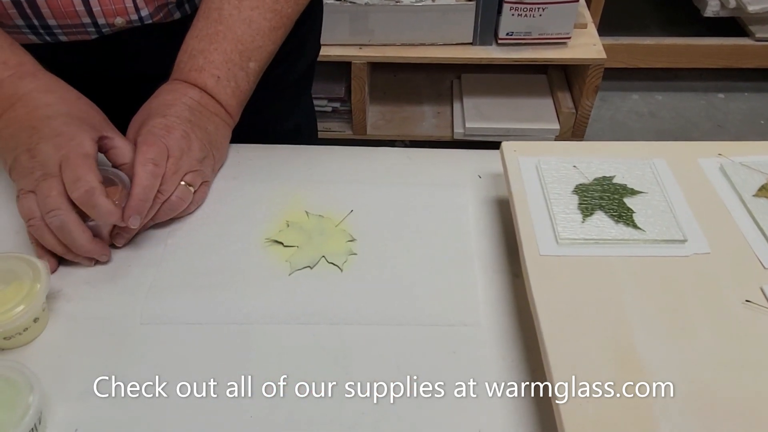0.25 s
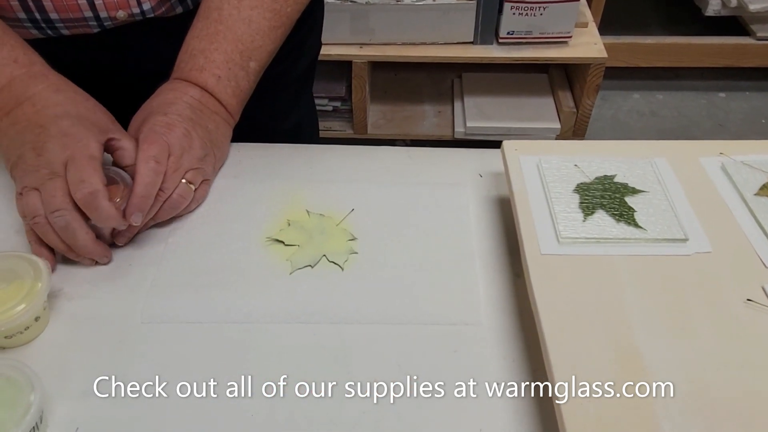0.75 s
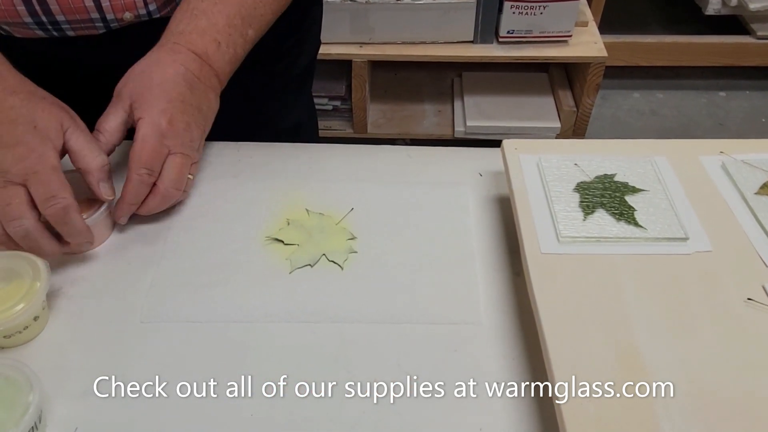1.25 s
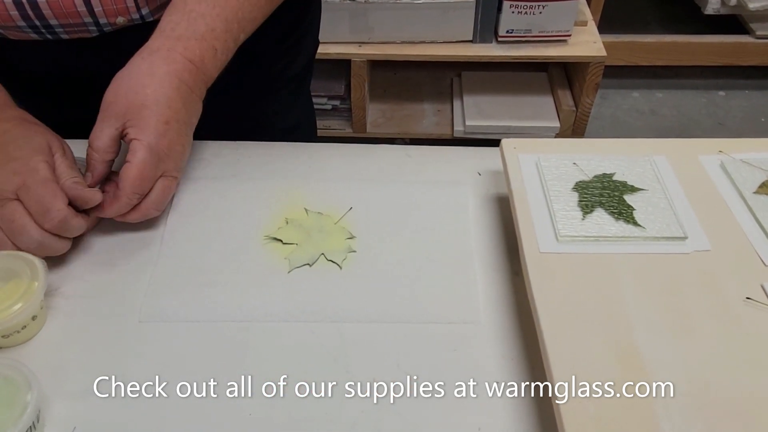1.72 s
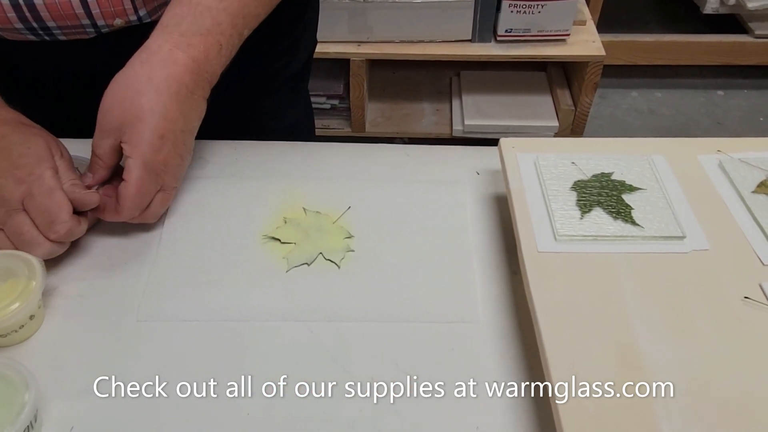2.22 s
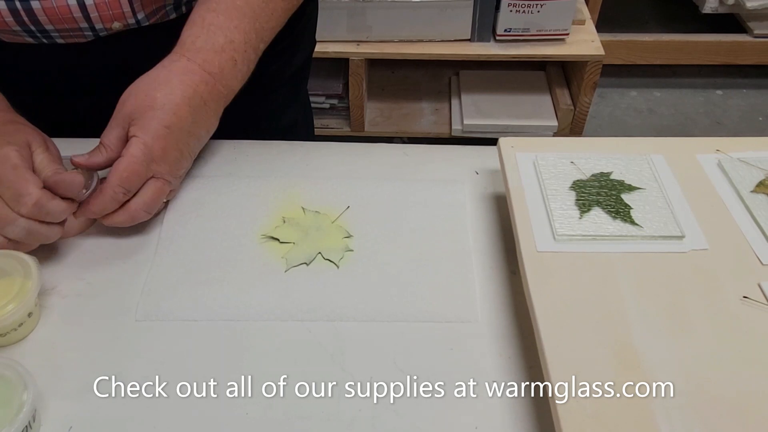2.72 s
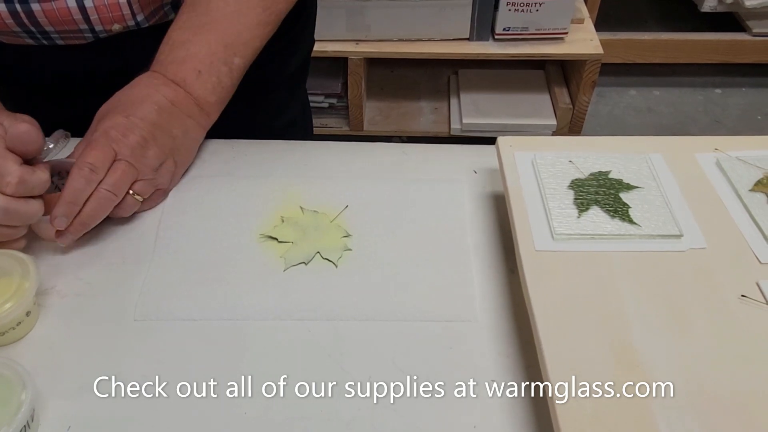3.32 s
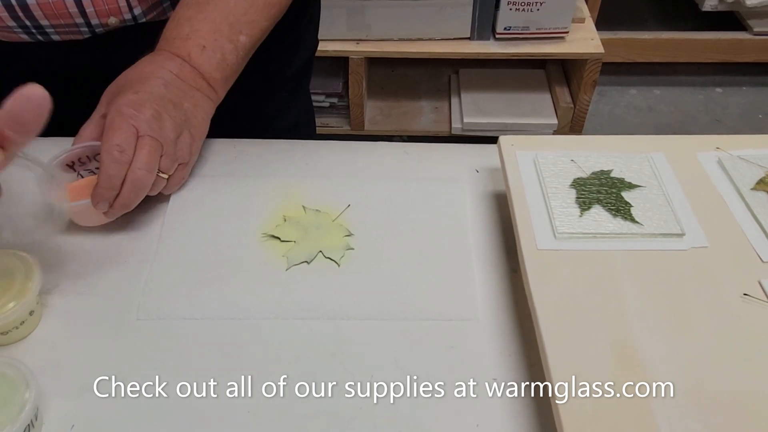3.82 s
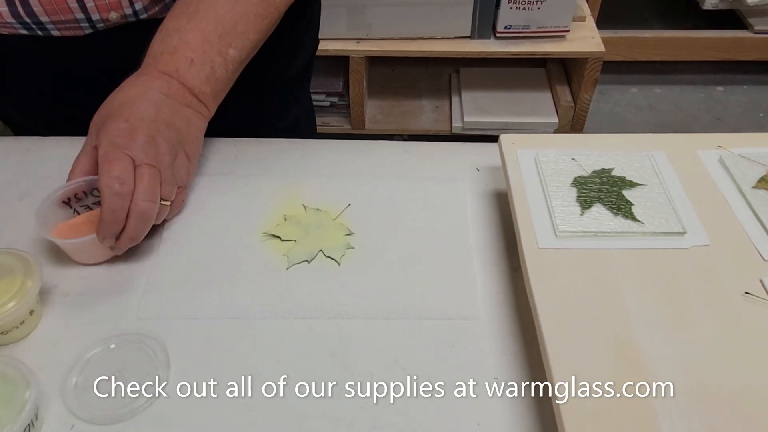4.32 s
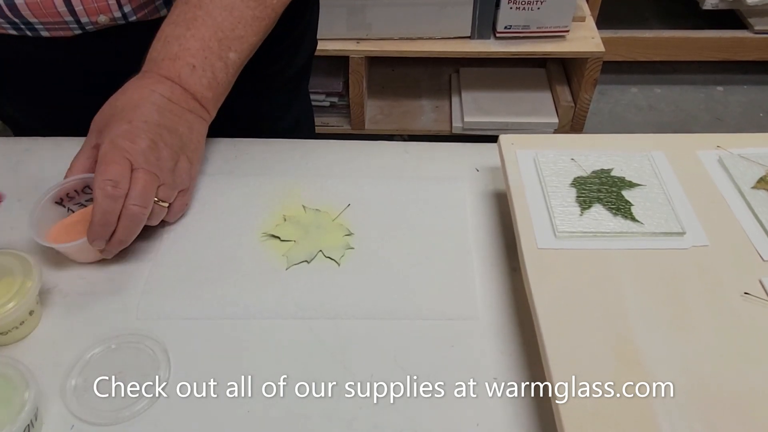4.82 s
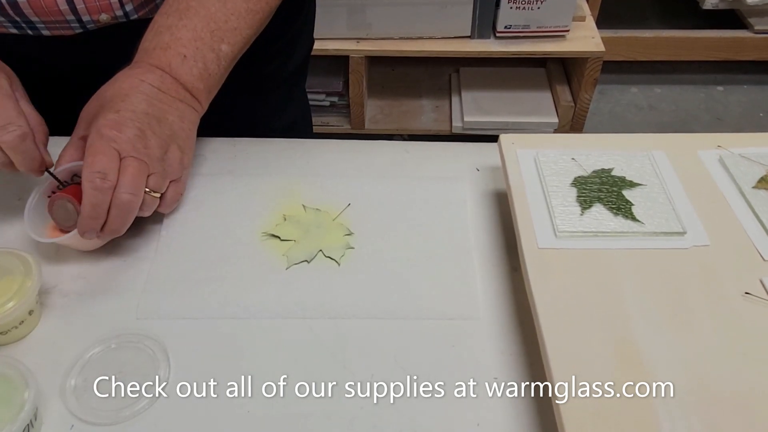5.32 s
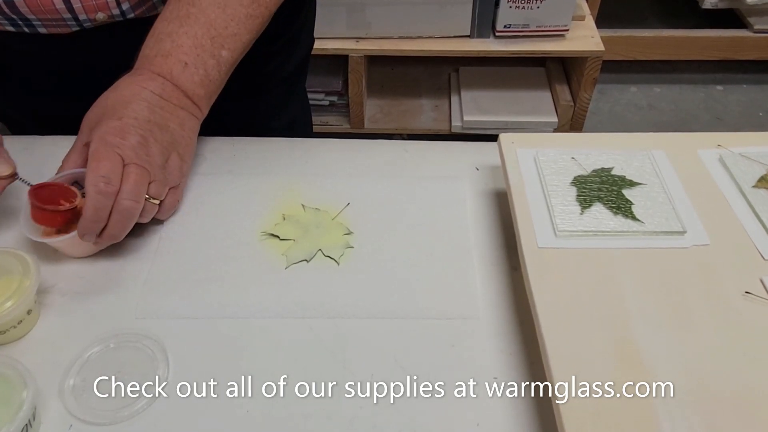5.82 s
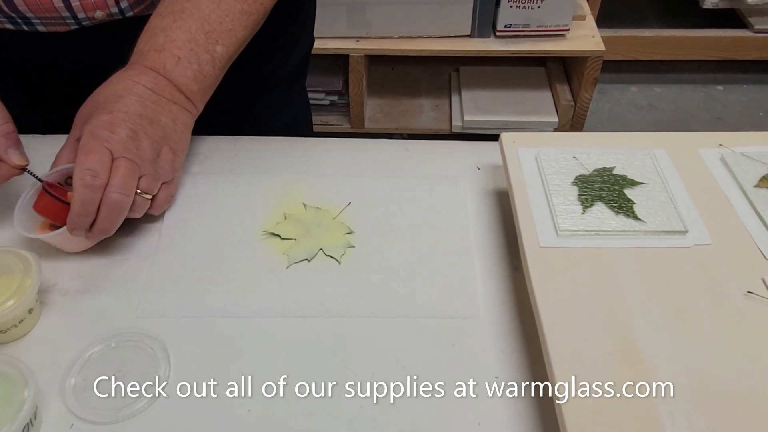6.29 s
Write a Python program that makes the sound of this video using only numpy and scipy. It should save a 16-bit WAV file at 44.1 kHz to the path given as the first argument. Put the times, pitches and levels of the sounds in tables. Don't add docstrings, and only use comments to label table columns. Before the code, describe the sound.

Thin plastic cup lid is pried loose with sharp snaps and faint finger rubbing, then drops and rattles on a bench over low hum.

```python
import sys
import numpy as np
from scipy import signal
from scipy.fft import rfft, irfft, next_fast_len
from scipy.io import wavfile
from scipy.ndimage import uniform_filter1d

SR = 44100
rng = np.random.default_rng(int(sys.argv[2]) if len(sys.argv) > 2 else 0)


def put_to_file(sound):
    columns = np.atleast_2d(sound).T
    safe = np.clip(columns, -1, 1)
    whole_steps = np.round(safe * 32767)
    wavfile.write(sys.argv[1], SR, whole_steps.astype(np.int16))


def nominal_scale(level):
    x = np.asarray(level, float) / 20
    return 10 ** x


N = 288855

# centre in Hz, width in Hz, level in dB.
RIM_MODES = [(1770, 190, -24), (2220, 500, -20.5), (2900, 1400, -5), (3960, 250, -13.5), (4480, 147, -10.5),
             (5260, 400, -8.5), (5760, 300, -7.5), (7035, 320, -3), (8540, 110, -12.5)]
# centre in Hz, width in Hz, level in dB.
WALL_MODES = [(760, 120, 10), (1100, 260, -0.5), (1330, 170, 0.5), (2090, 200, 0)]
# centre in Hz, width in Hz, level in dB.
BENCH_MODES = [(330, 290, -2), (560, 140, -7.5)]


def rim_snaps():
    # time in seconds, peak in dB, own ring in Hz, cup wall and treble in dB against the peak. Mostly
    # rim snaps; 0.887 and 2.5145 s are sharp starts of slides, 2.131 s echoes the snap before it, and at 4.0333
    # and 4.036 s the lid first strikes the bench.
    snaps = [(0.0105, -39, 3600, -20, -30), (0.0186, -8, 4040, -24, -6.5), (0.0273, -16, 2030, -27, -15),
             (0.046, -26, 2800, -16, -22), (0.880, -38, 4430, -24, -19), (0.887, -44, 7000, -24, -12),
             (0.9035, -26, 3690, -10, -11), (1.5349, -31.5, 7960, -40, -23),
             (1.5643, -29.5, 5400, -14.5, -25), (1.9864, -49.5, 1820, 10.5, -23),
             (2.0084, -43.5, 3560, 3.5, -20.5), (2.0159, -13.5, 3360, -49, -11.5),
             (2.1155, -6.5, 4680, -56, -24), (2.131, -28.5, 4636, -28, -25.5),
             (2.2216, -10.5, 3500, -23, -14), (2.3798, 1.5, 5000, -27, -32), (2.395, -26.5, 4700, -28, -30),
             (2.409, -26, 5000, -24, -28.5), (2.5145, -35, 5200, -22, -10), (2.5607, -21.5, 2230, -11, -24),
             (2.6866, -26.5, 4930, -25, -3.5), (3.4267, -20.5, 3060, -25, -11.5),
             (3.4285, -26, 4900, -30, -30), (3.486, -27, 2700, -24, -29), (3.5732, -34, 4870, -23, -26),
             (4.0333, -21.5, 3620, -29, -6.5), (4.036, -12.5, 4150, -38, -43)]
    return knocks(snaps, RIM_MODES, WALL_MODES, own_width=850, own_db=0.67, tick_hz=8500,
                  rattle=0.031, ms=1, soft_hz=8600)


def lid_bounces():
    # time in seconds, peak in dB, own ring in Hz, treble in dB against the peak.
    bounces = [(4.0888, -13, 4460, -17), (4.093, -11.5, 2620, -40), (4.1193, -10.5, 3650, -37),
               (4.126, -13, 2580, -40), (4.172, -24, 3480, -20), (4.199, -20, 4430, -31),
               (4.219, -15.5, 3870, -47), (4.2371, -25.5, 4470, -32), (4.2432, -18.5, 4460, -41),
               (4.2539, -22, 4480, -39), (4.2613, -31, 4000, -30), (4.279, -24, 3330, -33),
               (4.3004, -40, 4600, -25), (4.312, -39, 4560, -27), (4.331, -29, 4500, -31),
               (4.3473, -24, 4580, -49), (4.361, -39, 2560, -40), (4.384, -38, 2600, -36)]
    # centre in Hz, width in Hz, level in dB.
    lid_modes = [(1220, 210, -9), (2166, 34, 2.5), (3050, 190, 2), (3690, 71, -6), (3930, 160, -5),
                 (4190, 54, -8), (4480, 62, -16), (4680, 37, -25), (5060, 81, -13),
                 (2518, 22, 10), (2548, 16, 17), (2630, 24, 10), (2690, 30, 3), (2815, 36, 5)]
    bench_db = -24.5
    rows = [(s, db, hz, bench_db, treble_db) for s, db, hz, treble_db in bounces]
    return knocks(rows, lid_modes, BENCH_MODES, own_width=270, own_db=1.8, tick_hz=9000,
                  rattle=0.062, ms=3.07, soft_hz=9000)


def cup_thuds():
    # time in seconds, peak in dB, own ring in Hz, bench in dB against the peak. The rows at 0.604 and
    # 3.436 s are echoes of the thuds just before them.
    thuds = [(0.0185, -11.5, 840, -48), (0.0203, -12, 1114, -26), (0.028, -13.5, 1050, -50),
             (0.05, -37, 1050, -25), (0.062, -32, 830, -28), (0.595, -28.5, 760, -12),
             (0.604, -34.5, 1100, -29), (0.634, -51, 740, -18), (2.019, -21.5, 1810, -27),
             (2.221, -25.5, 1480, -46.5), (2.332, -36, 1248, -14), (2.379, -26, 1650, -41.5),
             (2.565, -34, 680, 3.5), (2.689, -34.5, 1190, -29), (3.426, -17.5, 1370, -40),
             (3.436, -28, 1660, -25), (3.487, -36, 660, -20), (4.035, -24, 1170, -7), (5.543, -47, 1300, 8)]
    # centre in Hz, width in Hz, level in dB.
    cup_modes = [(771, 60, 10.5), (843, 95, -5), (1085, 90, 4), (1380, 260, 8), (2040, 220, 2)]
    treble_db = -34.5
    rows = [(*row, treble_db) for row in thuds]
    return knocks(rows, cup_modes, BENCH_MODES, own_width=130, own_db=11.0, tick_hz=2500,
                  rattle=0.031, ms=1.76, soft_hz=2280)


def nail_and_sieve_ticks():
    # time in seconds, peak in dB, own ring in Hz. The row at 1.1463 s is the sharp start of a slide.
    ticks = [(0.4874, -56, 5420), (1.1463, -51, 6590), (1.1767, -33.5, 7600), (1.1947, -32, 6900),
             (1.3598, -44, 7700), (1.617, -36.5, 9150), (1.6244, -37, 8860), (3.1356, -30.5, 7600),
             (3.1484, -38, 7030), (3.99, -59, 8100), (5.1454, -54, 5260), (5.7414, -50, 8600),
             (6.352, -51.5, 9000), (6.3679, -46, 7680), (6.4126, -47, 5410), (6.4264, -51, 8100)]
    wall_db, treble_db = -49, -5.5
    rows = [(*row, wall_db, treble_db) for row in ticks]
    return knocks(rows, RIM_MODES[-2:], WALL_MODES, own_width=4300, own_db=3.0, tick_hz=16000,
                  rattle=0.11, ms=0.32)


def knocks(rows, modes, low_modes, own_width, own_db, tick_hz, rattle, ms, soft_hz=16000):
    size, lead = 8192, 256
    out = np.zeros(N + size)
    t = (np.arange(size) - lead) / SR
    creak = 0.15 * np.exp(np.minimum(t, 0) / 0.002)
    decay = np.exp(-np.maximum(t, 0) * 1000 / max(ms, 0.05))
    swell = np.where(t < 0, creak, decay)
    bursts = rng.standard_normal((len(rows), 1024))
    for (s, db, hz, low_db, treble_db), noise in zip(rows, bursts):
        burst = rattle * np.pad(noise ** 3, (0, size - 1024)) * swell
        burst[lead + 24] = 1
        push = below(burst, soft_hz)
        ring = body(push, modes) + nominal_scale(own_db) * resonate(push, hz, own_width)
        low = body(push, low_modes)
        cracks = 0.3 * np.pad(noise, (0, size - 1024)) * swell
        tick = below(below(above(burst + cracks, tick_hz), 15000), 15000)
        parts = (db, ring), (db + low_db, low), (db + treble_db, tick)
        sound = sum(nominal_scale(peak_db) * part / abs(part).max() for peak_db, part in parts)
        start = round(s * SR) - lead
        out[start:start + size] += sound
    return out[:N]


def rubbing():
    # start in seconds, hold in seconds, rub in dB,
    # cup wall and whistle in dB against the rub.
    slides = [(0.21, 0.0045, -70.5, 8.5, -21), (0.37, 0.025, -62.5, 0, -8), (0.64, 0.028, -63.5, -1.5, -4),
              (0.78, 0.079, -63, 1, -5.5), (0.895, 0.0035, -49, -5, -5), (0.94, 0.091, -64, 0, -5.5),
              (1.15, 0.043, -59, 3.5, -3.5), (1.28, 0.023, -59, 2, -3), (1.365, 0.032, -54.5, -8, 2.5),
              (1.415, 0.023, -46, -7, -3.5), (1.535, 0.033, -54.5, -6, 3), (1.61, 0.039, -67.5, -2, -6),
              (1.7, 0.016, -47, -11.5, -5.5), (2.51, 0.056, -51.5, -0.5, -8), (2.62, 0.05, -54, -3.5, -5.5),
              (2.715, 0.023, -49.5, 3, -2.5), (6.485, 0.02, -60, -3, -2.5)]
    # start in seconds, hold in seconds,
    # rub in dB, cup wall and whistle in dB against the rub.
    twists = [(2.83, 0.061, -63.5, -1, -1.5), (2.9, 0.019, -63, 4, 1.5), (2.95, 0.0089, -46.5, -3, -4),
              (3.035, 0.023, -53.5, -3, -6), (3.072, 0.035, -47.5, -5.5, -15),
              (3.16, 0.062, -50, -4.5, -11), (3.35, 0.027, -60.5, -8, -7), (3.405, 0.018, -54.5, -4, -8),
              (3.44, 0.093, -59, -7, -15), (3.568, 0.0042, -53.5, -9, -1), (3.6, 0.17, -72, -3, -10),
              (3.8, 0.18, -68, -37, -8), (4.46, 0.041, -70, -8, -8.5), (4.93, 0.031, -70.5, -15, -7.5)]
    # start in seconds, hold in seconds, rub in dB,
    # cup wall and whistle in dB against the rub.
    skids = [(0.012, 0.014, -44, 10, -24.5), (0.022, 0.0053, -35.5, -13, -21),
             (2.33, 0.029, -37.5, -28, -36.5), (2.514, 0.014, -60.5, -13, 7.5), (4.2, 0.13, -52, -9, -24)]
    # centre in Hz, width in Hz, level in dB.
    rub_modes = [(2330, 1700, 2), (3500, 730, 1.5), (4600, 1070, 8), (6026, 1100, 1.5), (6700, 1400, 5.5)]
    # centre in Hz, width in Hz, level in dB.
    skid_modes = [(1300, 350, 4.5), (2310, 1400, 14.5), (4230, 6000, -4.5)]
    # centre in Hz, width in Hz, level in dB.
    whistle_modes = [(7160, 3000, 0.1)]
    # centre in Hz, width in Hz, level in dB.
    lip_modes = [(7550, 950, 0.1)]
    # frequency in Hz, level in dB per Hz.
    fizz_colour = [(5180, -15), (6500, -15), (9500, 2), (13600, -5.5), (15000, -14.5), (16000, -30),
                   (16500, -43)]

    grip = nominal_scale(2.2 * evened(uniform_filter1d(rng.standard_normal(N), 130)))
    slip_size = nominal_scale(3.1 * np.minimum(rng.exponential(1, (3, N)), 5))
    both, left, right = grip * rng.standard_normal((3, N)) * slip_size
    slips = both + 3.3 * np.array([left, right])
    rim = above(body(slips, rub_modes), 1200)
    rim = below(rim, 6880)
    skidding = body(slips, skid_modes)
    wall = body(slips, WALL_MODES)
    whistle = body(body(slips, whistle_modes), whistle_modes)
    fizz = shaped(slips, lambda hz: nominal_scale(read(fizz_colour, hz)))
    lip = body(body(slips, lip_modes), lip_modes)

    slide = stroke_gains(slides, rise_db_per_s=749)
    twist = stroke_gains(twists, rise_db_per_s=749)
    skid = stroke_gains(skids, rise_db_per_s=4007)
    fizz_gain = nominal_scale(0.5) * (slide + skid)[2] + nominal_scale(-8.5) * twist[0]
    layers = [(rim, (slide + twist)[0]), (skidding, skid[0]), (wall, (slide + twist + skid)[1]),
              (whistle, (slide + skid)[2]), (fizz, fizz_gain), (lip, twist[2])]
    span = round(0.02 * SR)
    wander = rng.standard_normal((len(layers), N))
    wander = uniform_filter1d(uniform_filter1d(wander, span), span)
    return sum(evened(layer) * gain * nominal_scale(2.5 * evened(w)) for (layer, gain), w in zip(layers, wander))


def stroke_gains(rows, rise_db_per_s):
    fall_db_per_s = 522.5
    t, gain = np.arange(N) / SR, np.zeros((3, N))
    for s, hold, db, wall_db, whistle_db in rows:
        span = slice(round(max(s - 0.1, 0) * SR), round((s + hold + 0.15) * SR))
        rise_db = rise_db_per_s * np.maximum(s - t[span], 0)
        fall_db = fall_db_per_s * np.maximum(t[span] - s - hold, 0)
        gain[:, span] += nominal_scale(db - rise_db - fall_db) * nominal_scale(np.array([[0], [wall_db], [whistle_db]]))
    return gain


def shop(x):
    # frequency in Hz, time to fall by 60 dB in seconds.
    decay_times = [(300, 0.46), (1000, 0.16), (3000, 0.2), (6000, 0.23), (12000, 0.36)]
    # delay in milliseconds, level in dB.
    early = [(1.6, -11.5), (2.5, -28), (8.5, -19.5), (11, -29), (14.5, -38.5), (28, -33.5)]
    # frequency in Hz, level in dB.
    absorption = [(300, -7.5), (600, -7), (900, 0), (2000, -4.5), (3500, -4.5), (5500, -6.5), (8000, -13),
                  (12000, -18.5)]

    taps = np.zeros((3, 2, SR // 2))
    jitter = rng.integers(0, 20, (3, 2, (SR // 2 - 121) // 20))
    at = np.arange(120, SR // 2 - 20, 20) + jitter
    np.put_along_axis(taps, at, rng.choice([-1., 1.], at.shape), 2)
    hz, t, z = signal.stft(taps, SR, nperseg=128)
    t60 = np.maximum(read(decay_times, hz), 0.03)[:, None]
    tail = signal.istft(z * nominal_scale(-60 * t / t60), SR, nperseg=128)[1]
    build_s = 0.0022
    tail *= 1 - np.exp(-(np.arange(tail.shape[-1]) / (build_s * SR)) ** 2)
    tail /= np.linalg.norm(tail[0, 0])
    echoes = np.zeros((2, 2048))
    for ms, db in early:
        echoes[:, round(ms * SR / 1000)] += nominal_scale(db) * np.array([0.8, 1.1])
    phase = np.arange(3)[:, None] / 3 + 4.3 * np.arange(N) / SR
    turns = np.cos(np.pi * phase) * np.sqrt(2 / 3)
    late = signal.fftconvolve((turns * x)[:, None], tail, axes=2).sum(0)[:, :N]
    late = shaped(late, lambda hz: nominal_scale(read(absorption, hz)))
    return late + below(signal.oaconvolve(x[None], echoes, axes=1)[:, :N], 6130)


def room_tone():
    # time in seconds, level in dB.
    gain_drift = [(0.0, -49), (0.95, -49), (1.5, -49), (1.55, -51), (1.6, -46.5), (1.68, -50),
                  (2.81, -47.5), (4.01, -51), (4.6, -50), (5.51, -49.5), (5.56, -51), (6.55, -49.5)]
    # frequency in Hz, level in dB per Hz.
    rumble_colour = [(15, -58), (25, -23.5), (54, -6), (87, -2), (119, -4), (151, -10), (259, -19),
                     (361, -15), (465, -20.5), (502, -20.5), (900, -23), (1170, -73), (1980, -120)]
    # frequency in Hz, level in dB per Hz.
    hiss_colour = [(530, -7.5), (900, -18), (942, -7.5), (1330, 1.5), (2160, -5.5), (2250, -7.5),
                   (2770, -6.5), (8000, -24), (10400, -62), (17600, -120)]
    # frequency in Hz, level in dB per Hz.
    thin_colour = [(4710, -41), (8000, -14.5), (8810, 10.5), (10600, -1.5), (12900, 6.5), (14900, -5.5),
                   (15900, -19), (16500, -27.5)]
    # time in seconds, level in dB.
    stirs = [
        (0.02, -81),
        (2.02, -73.5),
        (4.1, -83.5),
    ]
    # frequency in Hz, coherence from 0 to 1.
    coherence = [(60, 0.935), (200, 1), (400, 0.073), (650, 0.3), (1400, 0.79), (2600, 0.33),
                 (5000, 0.0699), (12000, 0.035)]
    # frequency in Hz, left minus right in dB.
    balance = [(60, -0.5), (130, -1.0), (290, 0), (640, 2.5), (1410, -0.5), (3100, -7.5), (6820, -2),
               (15000, 7)]
    # centre in Hz, width in Hz, level in dB against the rumble.
    hum_lines = [(41.1, 4, -12), (61.3, 3.9, -1.5), (119.04, 5.74, -6.5), (376.2, 46, -19)]
    # frequency in Hz, level in dB against the rumble.
    hum_cores = [(41.0, -10), (59.8, -2)]

    def alike(hz):
        return np.clip(read(coherence, hz), 0, 1)

    a, b = rng.standard_normal((2, N))
    other = shaped(a, alike) + shaped(b, lambda hz: np.sqrt(1 - alike(hz) ** 2))
    pair = np.array([a, other])
    rumble, hiss, thin = (evened(shaped(pair, lambda hz: nominal_scale(read(colour, hz))))
                          for colour in (rumble_colour, hiss_colour, thin_colour))
    t = np.arange(N) / SR
    hum = np.zeros(N)
    for hz, width, db in hum_lines:
        noise = rng.standard_normal(N + SR)
        hum += nominal_scale(db) * evened(resonate(resonate(noise, hz, width), hz, width)[SR:])
    for hz, db in hum_cores:
        hum += nominal_scale(db) * np.sqrt(2) * np.sin(2 * np.pi * hz * t)
    drift_db = np.interp(t, *np.transpose(gain_drift)) + 49.0
    sink_db_per_s = 7.0
    thin_gain = nominal_scale(-95.5) + sum((t > s) * nominal_scale(db - sink_db_per_s * (t - s)) for s, db in stirs)
    air = nominal_scale(-50.5 + drift_db) * (nominal_scale(-3.0) * rumble + hum)
    air = air + nominal_scale(-62 + 0.34 * drift_db) * hiss
    air = air + thin_gain * thin
    return ports(*air, balance, lead_samples=16.16, turn=[(100, 0.17), (2000, -0.308), (8000, 0.018)])


def ports(left, right, balance, lead_samples, turn):
    def right_response(hz):
        phase = 2 * np.pi * hz * lead_samples / SR + read(turn, hz)
        return nominal_scale(-read(balance, hz) / 2) * np.exp(-1j * phase)

    left = shaped(left, lambda hz: nominal_scale(read(balance, hz) / 2))
    return np.array([left, shaped(right, right_response)])


def body(x, modes):
    return sum(nominal_scale(db) * resonate(x, hz, width) for hz, width, db in modes)


def resonate(x, hz, width):
    return signal.lfilter(*signal.iirpeak(min(hz, SR / 2.2), hz / width, SR), x)


def shaped(x, response):
    size = next_fast_len(N + 4096)
    return irfft(rfft(x, size) * response(np.fft.rfftfreq(size, 1 / SR)), size)[..., :N]


def read(points, hz):
    f, value = np.transpose(points)
    return np.interp(np.log(hz + 1), np.log(f + 1), value)


def evened(x):
    return x / np.sqrt(np.mean(x ** 2) + 1e-20)


def above(x, hz):
    return signal.sosfilt(signal.butter(4, min(hz, 15000), "high", fs=SR, output="sos"), x)


def below(x, hz):
    return signal.sosfilt(signal.butter(2, min(hz, 20000), fs=SR, output="sos"), x)


def scene():
    # frequency in Hz, left minus right in dB.
    near_balance = [(600, 1.5), (1800, -1.5), (2600, 5.5), (3600, -9.5), (4300, -6.5), (6300, -4.5),
                    (8500, 7.5), (13000, -3.5)]
    # frequency in Hz, phase in radians.
    near_turn = [(1800, -0.4), (2300, -0.6), (2600, -1.1), (3300, -1.9), (4100, -1.1), (5200, -0.8),
                 (8000, 0), (9500, 1.4), (11000, 3.6), (13000, 1.5)]
    cup = rim_snaps() + cup_thuds()
    small = nail_and_sieve_ticks() + lid_bounces()
    rub = rubbing()
    echoes = shop(cup + nominal_scale(-1.5) * small + rub[0])
    near = cup + small + rub + echoes
    return ports(*near, near_balance, lead_samples=11.2, turn=near_turn) + room_tone()


def low_pass(x):
    return signal.sosfilt(signal.butter(12, 16640, fs=SR, output="sos"), x)


def record(dry):
    limited = np.clip(above(dry, 34.6), -0.95, 0.95)
    edge = signal.firwin(255, 16150, window=("kaiser", 8), fs=SR)
    mix = signal.oaconvolve(limited, edge[None], "same")
    return low_pass(mix)


dry = scene()
out = record(dry)
put_to_file(out)
```